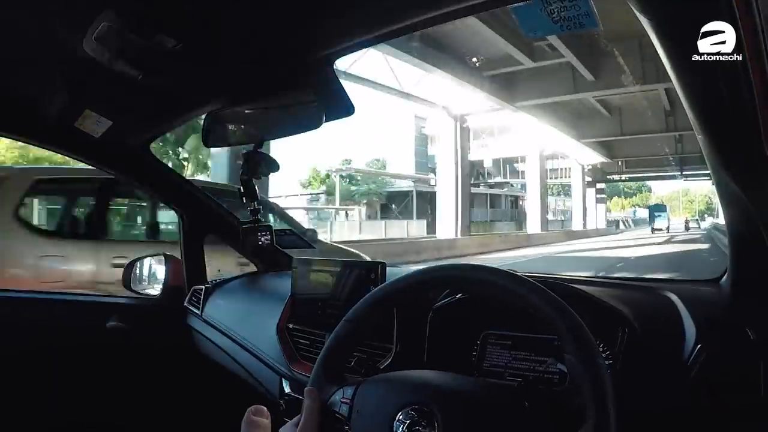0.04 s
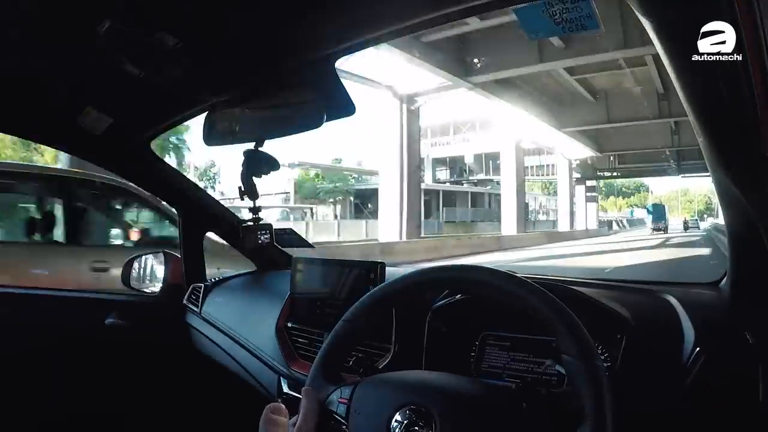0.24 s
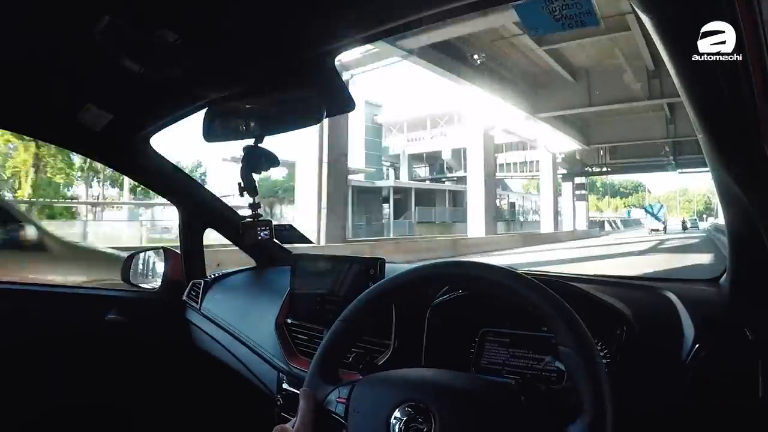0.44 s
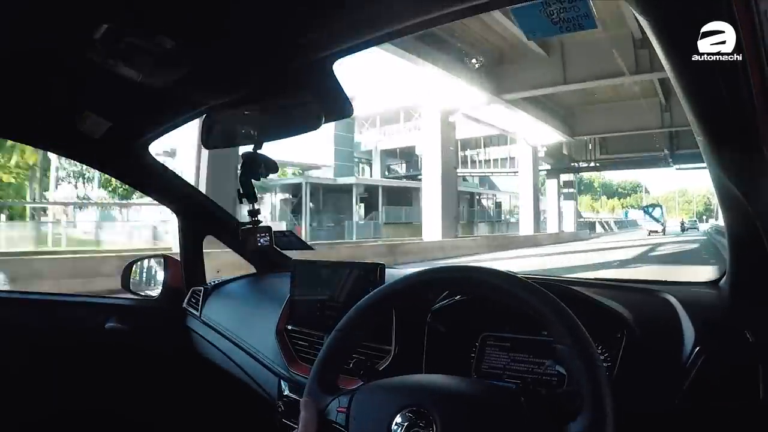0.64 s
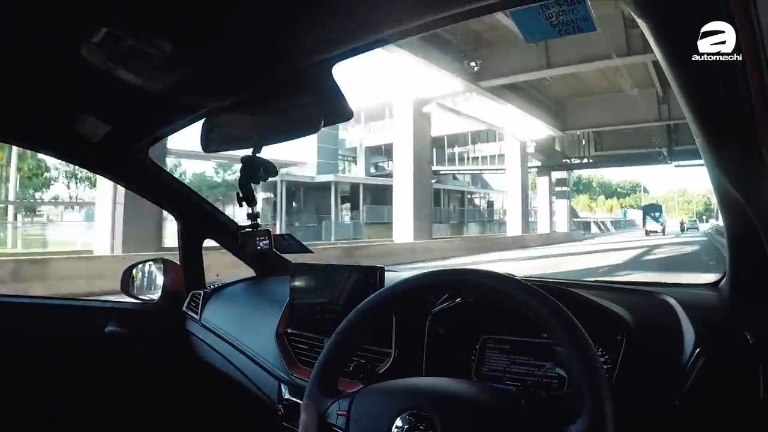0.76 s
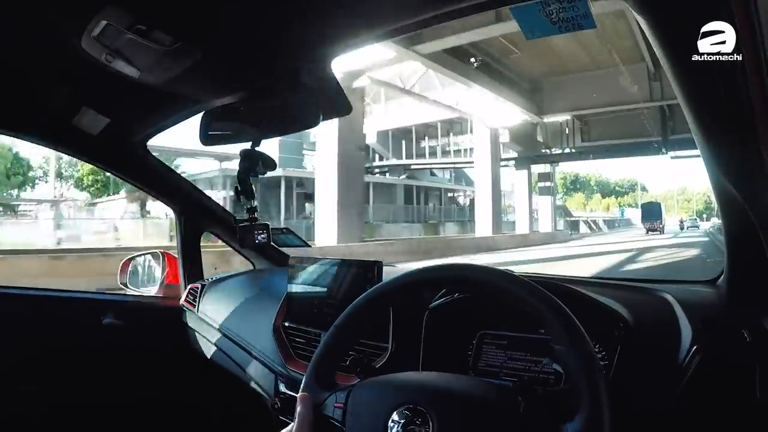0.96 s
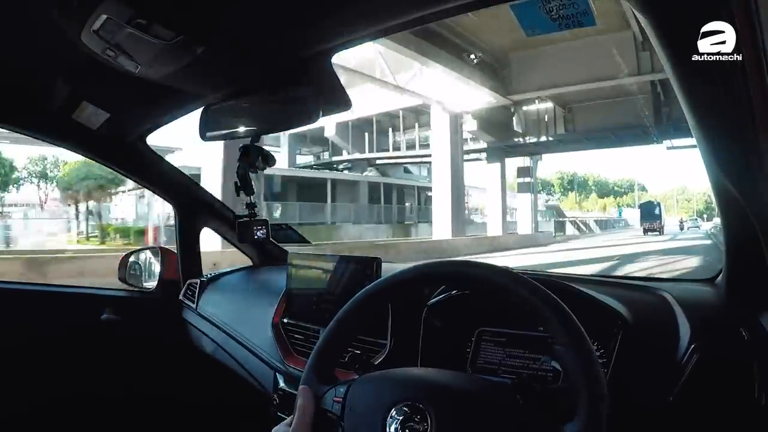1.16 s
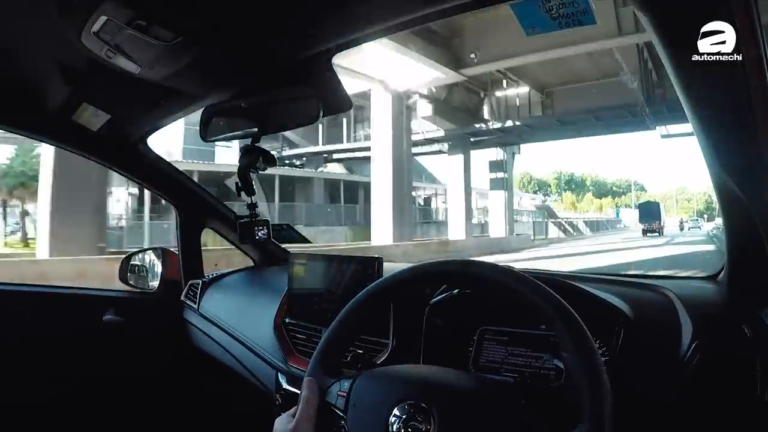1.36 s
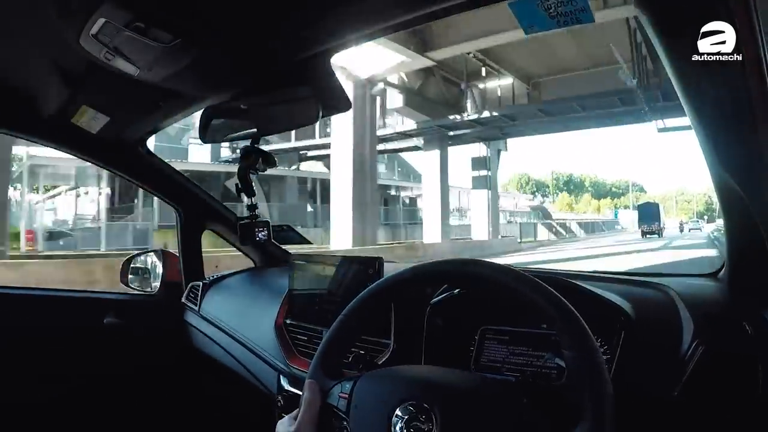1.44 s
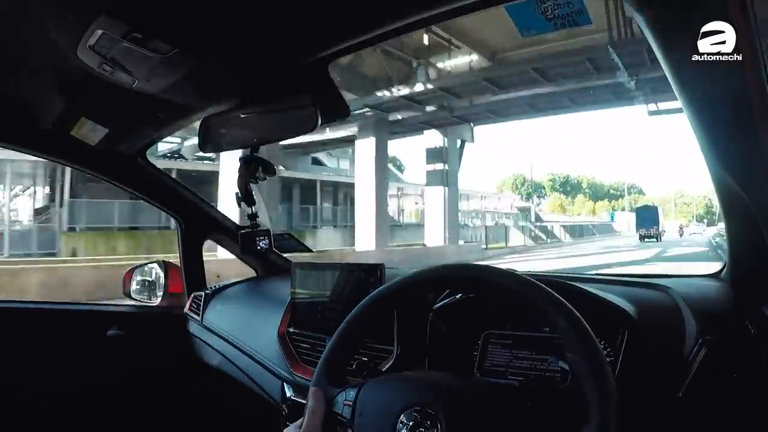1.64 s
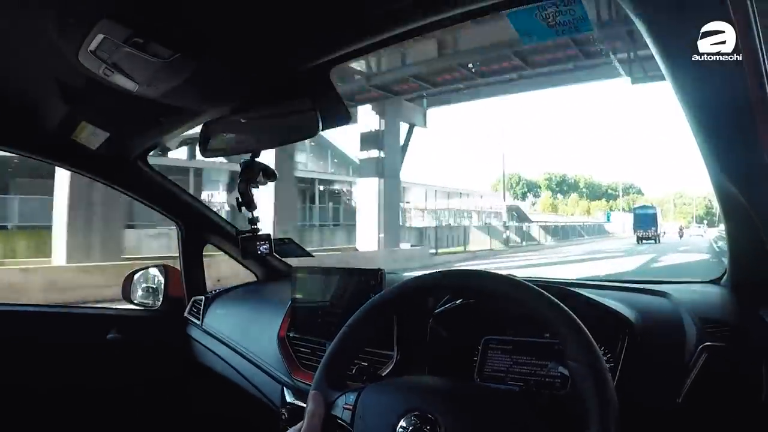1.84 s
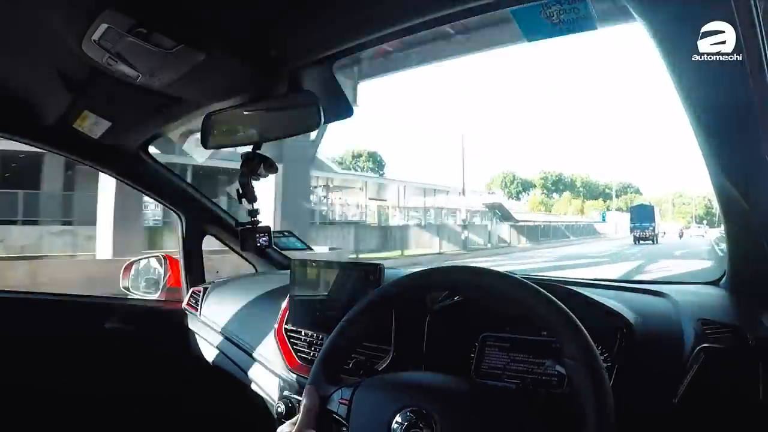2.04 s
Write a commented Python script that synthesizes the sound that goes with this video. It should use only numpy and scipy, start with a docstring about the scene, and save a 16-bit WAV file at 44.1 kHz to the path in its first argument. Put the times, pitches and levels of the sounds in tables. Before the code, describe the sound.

Inside a moving car, the engine's deep drone climbs, dipping several times, while overtones swell through cabin resonances. Muffled road rumble runs beneath; the climb slows and the boom grows loudest at the end, picked up by a cabin microphone.

```python
"""Inside a closed car on a smooth road, a four-cylinder engine revs up hard for about two seconds.
From the start, road rumble, engine roar and faint microphone hiss lie under a low firing note, a single tone.
As the revs climb, that note dips several times, overtones swell, and fainter tones sweep the cabin's resonances.
Towards the end the climb slows, the firing note booms loudest and the roar, shaped noise, is at its brightest."""
import sys
import numpy as np
from scipy import signal
from scipy.io import wavfile
from scipy.ndimage import uniform_filter1d

SR = 44100
rng = np.random.default_rng(int(sys.argv[2]) if len(sys.argv) > 2 else 0)


def volts(x):
    """Linear amplitude factor 10**(x/20) for a level x in dB, scalar or array-like."""
    e = np.asarray(x, float) / 20
    return 10 ** e


def master(y):
    """Save y as 16-bit WAV."""
    cut = np.clip(np.atleast_2d(y).T, -1, 1)
    pcm = np.round(cut * 32767)  # scale
    wavfile.write(sys.argv[1], SR, pcm.astype(np.int16))


N = 92257  # length in samples
TIME = np.arange(N) / SR  # s
CYLINDERS = 4  # firings in each four-stroke cycle
MID_HZ = 157  # firing rate at middle revs
TONE_WAVER_HZ = 6  # fastest waver of the overtones


def read(points, at, log=True):
    """Reads a table by straight lines between its points, on a log or plain axis."""
    x, value = np.transpose(points)
    if log:
        return np.interp(np.log(at + 1), np.log(x + 1), value)
    return np.interp(at, x, value)


def drift(rate_hz, count):
    """Sums slow sine waves, up to rate_hz, into random curves of unit spread, one per row."""
    hz = np.geomspace(rate_hz / 10, rate_hz, 12)
    t = np.arange(0, N + 128, 128) / SR
    turns = rng.random((count, len(hz), 1))
    waves = np.sin(2 * np.pi * (hz[:, None] * t + turns))
    slow = (waves / np.sqrt(hz)[:, None]).sum(1)
    slow /= slow.std(1, keepdims=True)
    return np.array([np.interp(TIME, t, row) for row in slow])


def noise(field_db, patchy_db, size):
    """Joins random short-time spectra shaped by field_db(hz, s) in dB per Hz, with drifting patches."""
    hop = size // 4
    hz = np.fft.rfftfreq(size, 1 / SR)
    t = np.arange(N // hop + 5) * hop / SR
    real, imaginary, patches = rng.standard_normal((len(t), len(hz), 3)).T
    # smooth the patches over frequency, then over time
    patches = uniform_filter1d(patches, size=9, axis=0)
    patches = uniform_filter1d(patches, size=7, axis=1)
    level_db = field_db(hz[:, None], t[None]) + patchy_db * patches / patches.std()
    spectra = (real + 1j * imaginary) * volts(level_db)
    sound = signal.istft(spectra, nperseg=size, noverlap=size - hop)[1][:N]
    return sound * np.sqrt(1.5 * SR / size)


def tone(multiple, cycles, level_db, start=0):
    """A sine wave at a multiple of the cycle rate, with its level in dB rms."""
    return np.sqrt(2) * volts(level_db) * np.sin(2 * np.pi * (multiple * cycles + start))


# How fast the cylinders fire as the engine revs up, before jitter: (t/s, f/Hz)
FIRING_RATE = [(0.0, 103.4), (0.13, 109.8), (0.26, 116), (0.39, 121.4), (0.52, 127.3), (0.65, 135.1),
               (0.78, 142.1), (0.91, 150.25), (1.04, 157.3), (1.17, 164.7), (1.3, 170.6), (1.43, 177.4),
               (1.56, 180.9), (1.69, 182.6), (1.82, 185.6), (1.95, 186.4), (2.09, 189.35)]


def crank():
    """The turning engine: firing rate in Hz, and its running total as a count of four-stroke cycles."""
    speed_jitter = 0.0016  # share of the speed
    hz = read(FIRING_RATE, TIME, log=False) * (1 + speed_jitter * drift(11, count=1)[0])
    return hz, np.cumsum(hz) / SR / CYLINDERS


# Loudness of the firing note at the seat, before its waver: (t/s, level/dB rms)
FIRING_NOTE_LEVEL = [(0, -28), (.04, -24), (.15, -23), (.195, -31), (.22, -24), (.26, -23.5), (.29, -37),
                     (.35, -37), (.385, -24.5), (.58, -22.5), (.71, -23.5), (.78, -30), (.815, -38),
                     (.845, -29), (.88, -37), (.92, -33), (1.0, -46), (1.07, -40), (1.11, -28.5),
                     (1.28, -30), (1.32, -25), (1.37, -27.5), (1.41, -22), (1.53, -25), (1.58, -22),
                     (1.69, -21.5), (1.81, -18.5), (2.09, -17)]


def boom(cycles):
    """The firing note: one pressure beat per firing, heard as nearly a pure tone."""
    waver_db, waver_hz = 0.7, 16
    level_db = read(FIRING_NOTE_LEVEL, TIME, log=False) + waver_db * drift(waver_hz, count=1)[0]
    return tone(CYLINDERS, cycles, level_db)


# Which multiples of the cycle rate are the strong overtones: (multiple, one per overtone)
STRONG_MULTIPLES = (5, 7, 8, 10)
# How each strong overtone swells on its own, before its waver:
# (t/s, then level/dB rms of multiples 5, 7, 8 and 10)
STRONG_LEVELS = [(0, -45, -50, -47, -44), (.07, -45, -49, -43, -42), (.12, -45, -48, -30, -39),
                 (.2, -45, -45, -34, -44), (.3, -48, -44, -41, -52), (.42, -47, -38, -39, -42),
                 (.52, -42, -44, -40, -37), (.6, -52, -42, -40, -40), (.67, -53, -40, -31, -47),
                 (.78, -48, -39, -39, -52), (.86, -43, -53, -33, -42), (.95, -45, -38, -30, -40),
                 (1.05, -49, -37, -30, -49), (1.14, -42, -37, -33, -45), (1.22, -36, -37, -43, -47),
                 (1.33, -35, -32, -43, -51), (1.5, -33, -33, -42, -50), (1.62, -35, -35, -42, -42),
                 (1.76, -34, -38, -34, -39), (1.86, -32, -41, -37, -36), (2.09, -32, -37, -40, -37)]


def strong_overtones(cycles):
    """Four clean tones locked to the engine speed, each swelling on its own."""
    waver_db = 0.8
    t, *levels = np.transpose(STRONG_LEVELS)
    wavers = drift(TONE_WAVER_HZ, count=len(STRONG_MULTIPLES))
    starts = rng.random(len(STRONG_MULTIPLES))
    total = np.zeros(N)
    for multiple, level, waver, start in zip(STRONG_MULTIPLES, levels, wavers, starts):
        level_db = np.interp(TIME, t, level) + waver_db * waver
        total += tone(multiple, cycles, level_db, start)
    return total


# The fainter tones, before cabin, revs and waver: (multiple of the cycle rate, level/dB rms)
FAINT_LEVELS = [(6, -48.5), (9, -46.5), (11, -46.5), (12, -46), (13, -49.5), (14, -47), (15, -50.5),
                (16, -52), (17, -51.5), (18, -51), (19, -57.5), (20, -51.5), (21, -57.5), (22, -55.5),
                (24, -52.5), (26, -56.5), (28, -54)]
# How body and cabin boost or weaken engine sound: (f/Hz, level/dB)
CABIN_RESPONSE = [(155, -2), (185, -13), (215, 10), (240, 3.5), (260, -4), (285, 1.5), (315, 10),
                  (340, 0.5), (360, -0.5), (385, 0.5), (420, 0), (450, -0.5), (480, -1), (520, 0.5),
                  (555, 1), (583, 13), (605, 3.5), (628, -7.5), (665, 4.5), (700, -3), (735, 1.5),
                  (800, -1.5), (900, 2), (1000, -1.5), (1130, -2.5), (1350, -4.5)]


def faint_overtones(hz, cycles):
    """Unequal cylinders sound multiples of the cycle rate, each coloured by the cabin as it glides."""
    waver_db, rise_db_per_octave = 1.5, 7.5
    wavers = drift(TONE_WAVER_HZ, count=len(FAINT_LEVELS))
    starts = rng.random(len(FAINT_LEVELS))
    rise_db = rise_db_per_octave * np.log2(hz / MID_HZ)  # louder with revs
    total = np.zeros(N)
    for (multiple, level), waver, start in zip(FAINT_LEVELS, wavers, starts):
        cabin_db = read(CABIN_RESPONSE, multiple * hz / CYLINDERS)
        level_db = level + cabin_db + rise_db + waver_db * waver
        total += tone(multiple, cycles, level_db, start)
    return total


# Tyre and suspension noise, before surface and patches: (f/Hz, level/dB per Hz)
ROAD_SPECTRUM = [(12, -78), (22, -64.5), (35, -49.5), (55, -51.5), (80, -53.5), (115, -50), (150, -55.5),
                 (220, -60.5), (400, -65), (800, -92), (2500, -140)]
# Rougher and smoother stretches of road, added to that: (t/s, level/dB)
ROAD_SURFACE = [(0, -4), (.26, 1.5), (.5, -2.5), (.8, -4), (1.05, -0.5), (1.28, 1.5), (1.6, 1), (1.8, -2),
                (2.09, 0.5)]


def road():
    """Tyres and suspension send a lumpy low rumble through the floor."""
    def field(f, s):
        return read(ROAD_SPECTRUM, f) + read(ROAD_SURFACE, s, log=False)
    return noise(field, patchy_db=1.0, size=4096)


# Intake, exhaust and air noise at middle revs, before cabin, patches and throb: (f/Hz, level/dB per Hz)
ROAR_SPECTRUM = [(100, -74), (200, -65), (320, -63), (450, -70.5), (600, -64.5), (800, -69.5), (1100, -71),
                 (1600, -78), (2500, -87.5), (3200, -91.5), (4500, -95), (6300, -103), (8000, -108),
                 (10500, -112), (15000, -120)]
# How fast that noise grows with revs: (f/Hz, level/dB per octave of engine speed)
ROAR_GROWTH = [(200, 1), (800, 1), (2000, 7.5), (5000, 11), (10000, 7)]


def roar(cycles):
    """Intake, exhaust and air make broad noise that brightens with revs and throbs with each firing."""
    cabin_share, throb_depth = 0.3, 0.12

    def field(f, s):
        octaves = np.log2(read(FIRING_RATE, s, log=False) / MID_HZ)
        cabin_db = cabin_share * read(CABIN_RESPONSE, f)
        return read(ROAR_SPECTRUM, f) + cabin_db + read(ROAR_GROWTH, f) * octaves

    throb = 1 + throb_depth * np.cos(2 * np.pi * CYLINDERS * cycles)
    return noise(field, patchy_db=-0.76, size=2048) * throb


# Microphone hiss, before patches: (f/Hz, level/dB per Hz)
HISS_SPECTRUM = [(1000, -111), (8000, -112), (15500, -114)]


def microphone_hiss():
    """The microphone's own faint noise, with a spectrum that stays steady apart from small patches."""
    def field(f, s):
        return read(HISS_SPECTRUM, f) + 0 * s  # same shape at every moment
    return noise(field, patchy_db=0.5, size=1024)


def scene():
    """Adds the engine's tones, the road and the roar into one channel."""
    hz, cycles = crank()
    engine_tones = boom(cycles) + strong_overtones(cycles) + faint_overtones(hz, cycles)
    return (engine_tones + road() + roar(cycles))[None]


def roll_off(x):
    """The treble ends steeply here."""
    return signal.sosfilt(signal.butter(12, 15720, fs=SR, output="sos"), x)


def record(dry):
    """Adds microphone hiss to the sound in the cabin and finishes the mix."""
    mix = dry + microphone_hiss()
    return roll_off(mix)


dry = scene()
out = record(dry)
master(out)
```